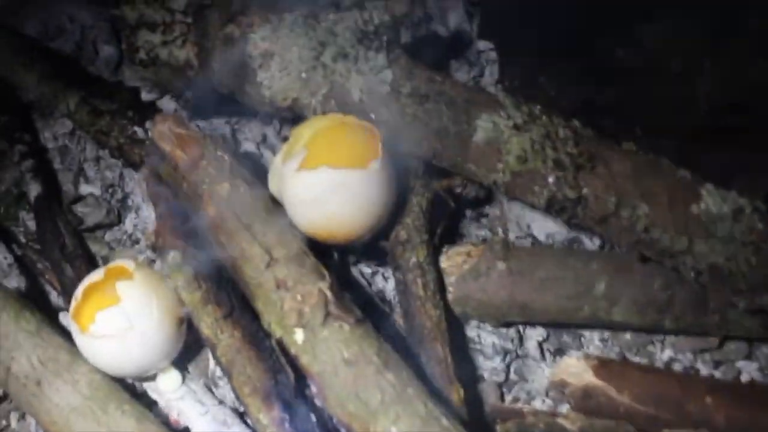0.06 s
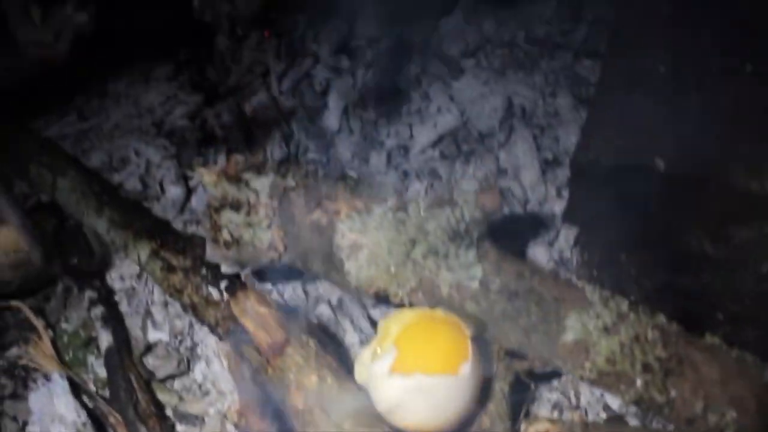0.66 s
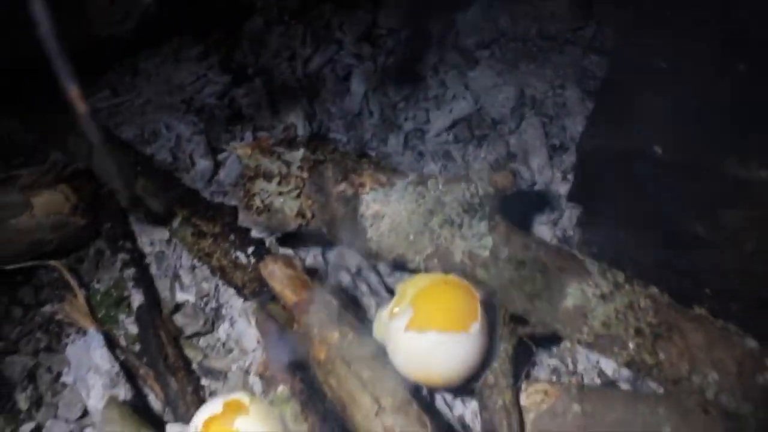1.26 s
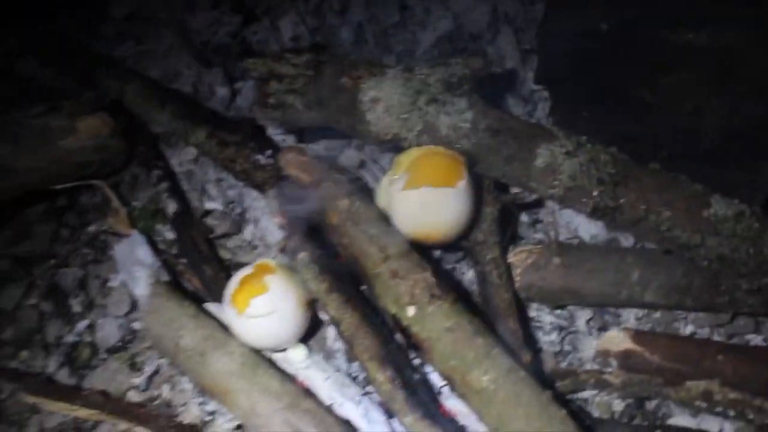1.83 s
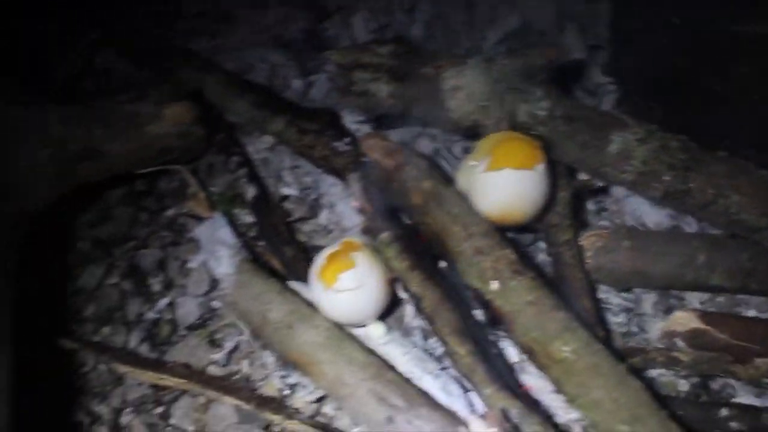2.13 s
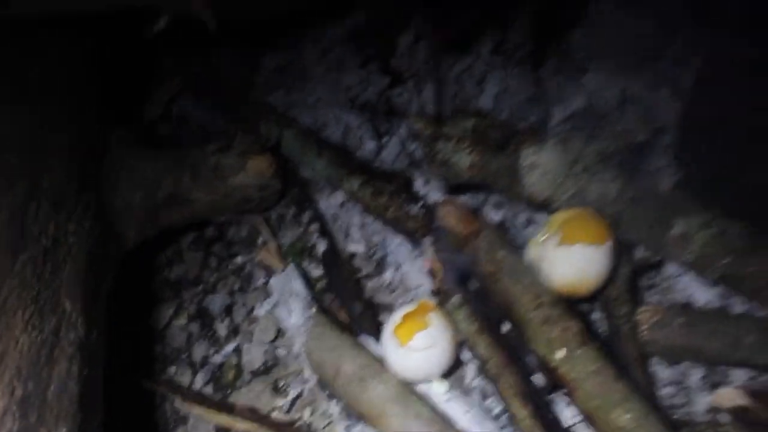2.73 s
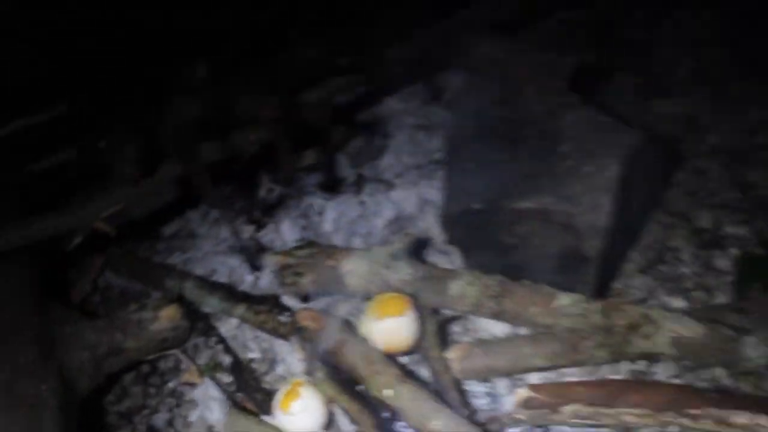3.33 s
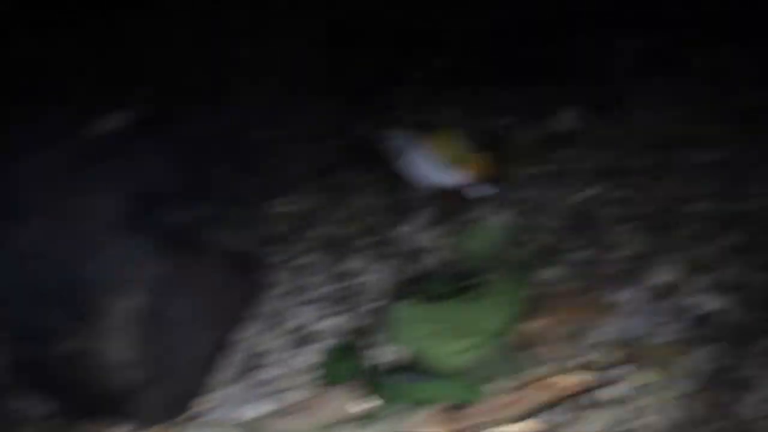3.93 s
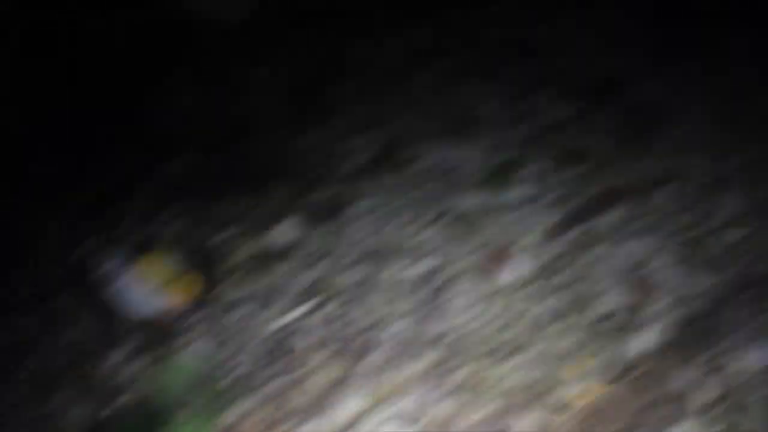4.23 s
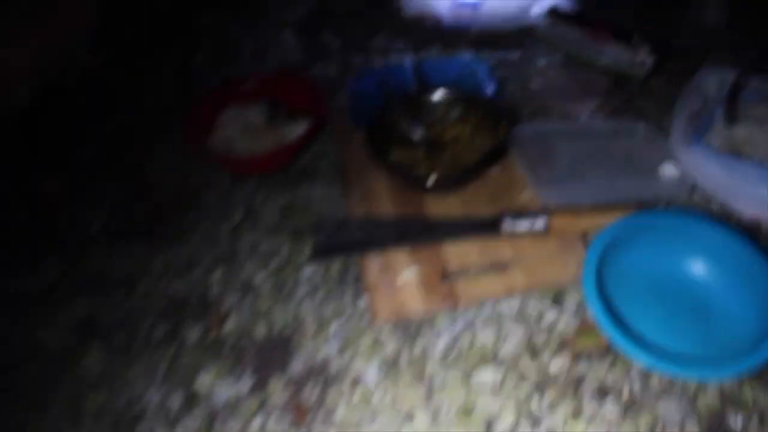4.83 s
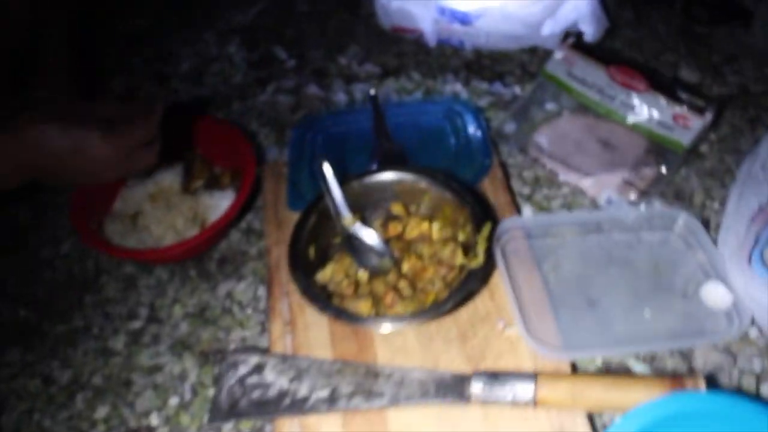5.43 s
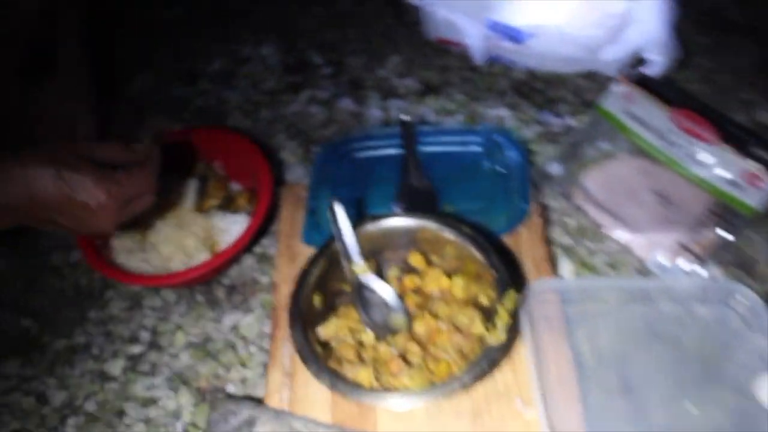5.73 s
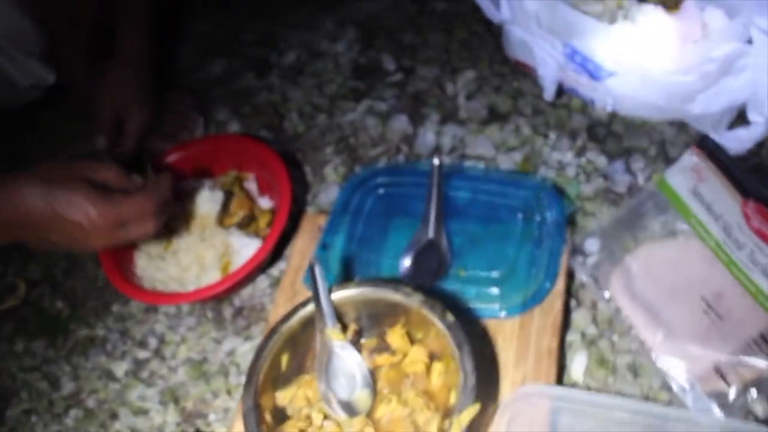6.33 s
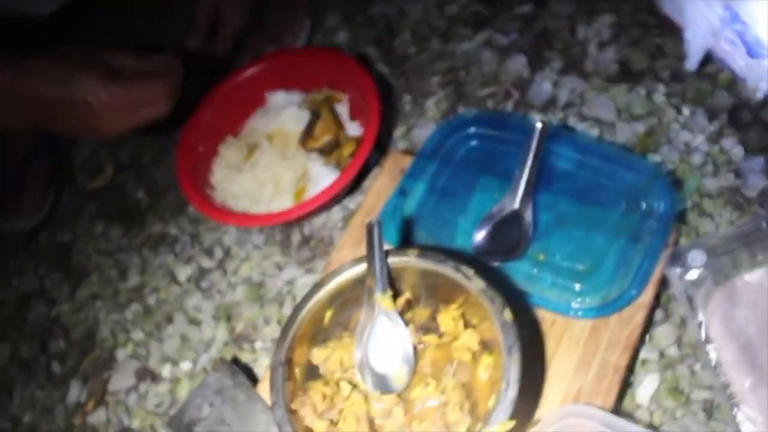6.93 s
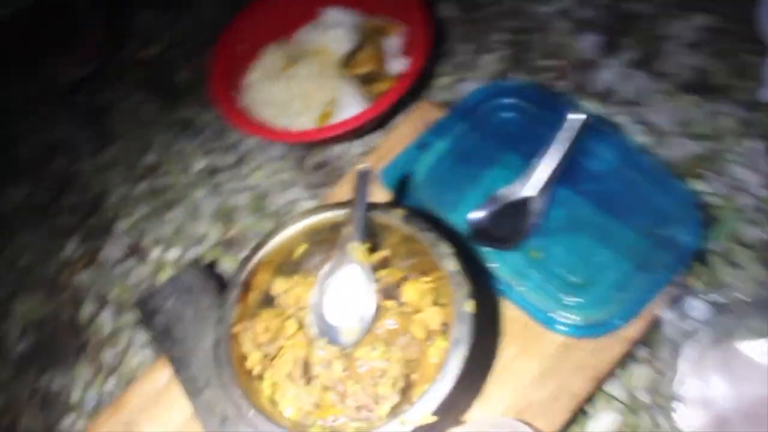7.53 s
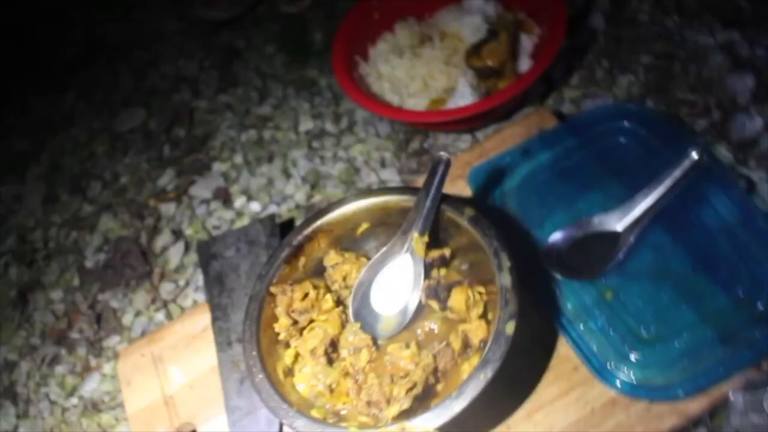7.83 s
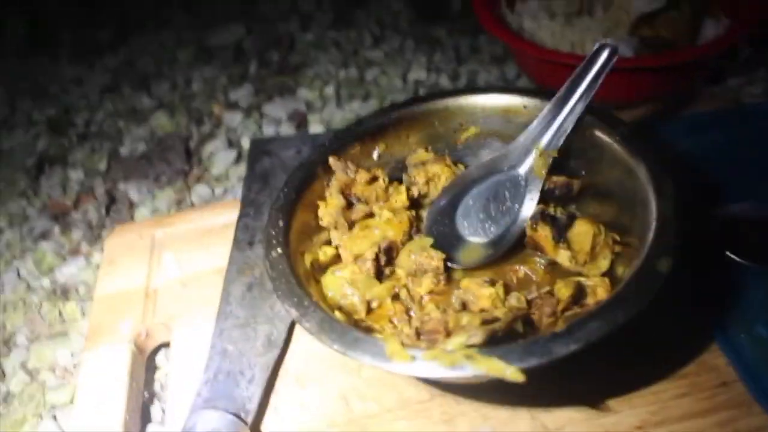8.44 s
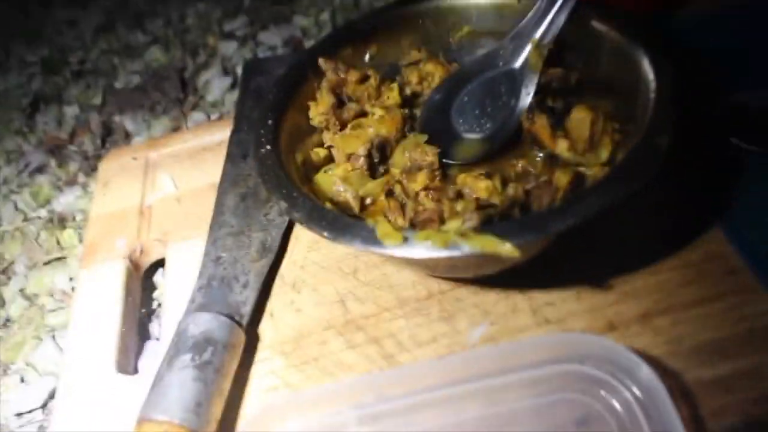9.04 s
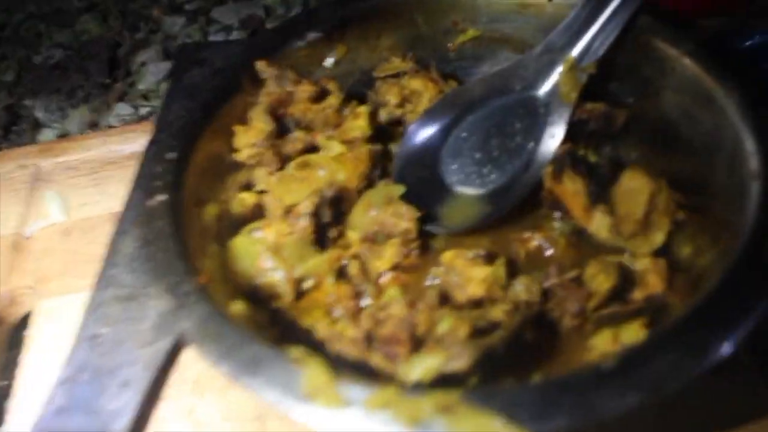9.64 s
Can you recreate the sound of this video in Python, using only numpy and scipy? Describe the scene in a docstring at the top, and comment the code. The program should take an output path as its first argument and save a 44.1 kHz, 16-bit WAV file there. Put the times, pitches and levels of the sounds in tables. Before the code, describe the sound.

Sharp cracks of burning wood, one short and two long owl hoots, and faint crickets and a rasping katydid in a night forest.

```python
"""A wood fire snaps close by in a night forest, and an owl gives one short and two long, low hoots.
Pockets of gas burst the logs; the owl's puffed throat sounds a nearly pure voice that slopes and
trees echo. On the left a katydid rasps five times a second, scraper over file. A cricket trills,
another chirps, and a far insect chorus hums in a soft hiss, with a little microphone rumble
and one faint, hollow tap near the end."""
import sys
import numpy as np
from scipy import signal
from scipy.fft import rfft, irfft, next_fast_len
from scipy.io import wavfile
from scipy.ndimage import uniform_filter1d

SR = 44100
rng = np.random.default_rng(int(sys.argv[2]) if len(sys.argv) > 2 else 0)


def to_wav(sig):
    """Store sig (one row per channel, or 1-D mono) as 16-bit WAV at the path in sys.argv[1].

    Samples outside -1..1 are clipped; the rate is SR.
    """
    pcm = np.clip(np.atleast_2d(sig), -1, 1) * 32767
    pcm = np.round(pcm).astype(np.int16)
    wavfile.write(sys.argv[1], SR, pcm.T)  # frames by channels


N = 426447
TIME = np.arange(N) / SR
# how alike the two channels are for far sound: (frequency [Hz], coherence [0-1])
COHERENCE = [(60, 0.54), (600, 0.7), (1400, 0.43), (3000, 0.13), (4500, 0.41), (7000, 0.09), (15000, 0)]


def gain_of(db):
    """Decibels to a gain."""
    return 10 ** (np.asarray(db) / 20)


def unit_rms(x):
    """Scaled to an rms of one."""
    return x / np.sqrt(np.mean(x ** 2) + 1e-20)


def curve_at(points, hz):
    """A curve's value at hz, on a log-frequency axis."""
    f, value = np.transpose(points)
    return np.interp(np.log(hz + 1), np.log(f + 1), value)


def add(mix, s, sound):
    """Adds a sound into the mix at s seconds."""
    part = mix[..., max(round(s * SR), 0):][..., :sound.shape[-1]]
    part += sound[..., :part.shape[-1]]


def panned(x, balance_db):
    """Two channels, the left louder by balance_db."""
    return x * gain_of(np.array([[balance_db], [-balance_db]]) / 2)


def delayed(x, samples):
    """A delay by a small, fractional number of samples."""
    size = 2 * len(x)
    return irfft(rfft(x, size) * np.exp(-2j * np.pi * np.fft.rfftfreq(size) * samples), size)[:len(x)]


def drift(rate):
    """Smooth random modulation of unit rms, changing about rate times a second."""
    lowpass = np.exp(-(np.fft.rfftfreq(N, 1 / SR) / rate) ** 2)
    return unit_rms(irfft(rfft(rng.standard_normal(N)) * lowpass, N))


def ring(points, size=1024):
    """The causal impulse response of a spectrum: (frequency [Hz], level [dB])."""
    log_gain = np.log(gain_of(curve_at(points, abs(np.fft.fftfreq(size, 1 / SR)))))
    return np.fft.ifft(np.exp(np.conj(signal.hilbert(log_gain)))).real


def far_noise(gain):
    """Noise from all around, coloured by a gain that is a function of frequency."""
    size = next_fast_len(N)
    hz = np.fft.rfftfreq(size, 1 / SR)
    left, other = rfft(rng.standard_normal((2, size)))
    same = curve_at(COHERENCE, hz)
    right = same * left + np.sqrt(1 - same ** 2) * other
    return unit_rms(irfft(np.array([left, right]) * gain(hz), size)[:, :N])


def forest(x, delay=.008):
    """Scattered echoes from trunks and leaves; the treble dies first."""
    # reverb among the trees: (frequency [Hz], time to fall 60 dB [s])
    decay_times = [(300, 0.95), (700, 0.47), (2000, 0.24), (7000, 0.3), (11000, 0.27), (16000, .11)]
    taps = rng.standard_normal((2, SR)) * (rng.random(SR) < 3000 / SR)
    hz, t, bands = signal.stft(taps, SR, nperseg=256)
    same, t60 = curve_at(COHERENCE, hz)[:, None], curve_at(decay_times, hz)[:, None]
    bands[1] = same * bands[0] + np.sqrt(1 - same ** 2) * bands[1]
    decay = gain_of(-60 * t / t60) * np.sqrt(np.log(1e6) / t60)
    tail = signal.istft(bands * decay, SR, nperseg=256)[1] / np.linalg.norm(taps[0])
    out = np.zeros((2, N))
    add(out, delay, signal.fftconvolve(np.atleast_2d(x), tail, axes=1))
    return out


def night_bed(hiss_db=-50.5):
    """A soft hiss and the blurred bands of far insects."""
    # soft night hiss, cut off above about 16 kHz by a low-pass: (frequency [Hz], relative level [dB])
    hiss_colour = [(15, -35), (40, -13.5), (110, -4), (220, -4), (420, 0.5), (800, -1), (1300, -3),
                   (2400, -7), (3200, -10), (6000, -11), (9000, -9), (11000, -16.5), (15600, -19.5),
                   (16400, -34)]
    # far insect choruses: (centre [Hz], width [Hz], level [dB])
    choruses = [(1806, 117, -58.5), (1975, 257, -57.5), (2800, 220, -65.5), (4140, 610, -56),
                (4660, 530, -57.5)]
    bed = gain_of(hiss_db) * far_noise(lambda f: gain_of(curve_at(hiss_colour, f)))
    for hz, width, level_db in choruses:
        flicker = gain_of(level_db + drift(20))
        bed += flicker * far_noise(lambda f: 1 / (1 + 2 * ((f - hz) / width) ** 2) ** 1.45)
    return bed


def handling_rumble():
    """The carried microphone rumbles a little."""
    # the rumble's fader moves: (time [s], level [dB])
    levels = [(2.9, -98), (3.4, -66), (4.1, -68), (4.8, -62), (5.1, -75), (5.5, -77)]
    colour = [(10, -11), (30, -6.5), (110, -7), (250, -21), (800, -75)]  # (frequency [Hz], level [dB])
    rumble = far_noise(lambda f: gain_of(curve_at(colour, f)))
    return rumble * gain_of(np.interp(TIME, *np.transpose(levels)))


def soft_tap(s=8.950, hz=535, level_db=-42, t60=.072, attack_s=.00055):
    """One faint, hollow tap: a damped sine."""
    t = np.arange(4096) / SR
    envelope = gain_of(level_db - 60 * t / t60) * (1 - np.exp(-t / attack_s))
    out = np.zeros(N)
    add(out, s, envelope * np.sin(2 * np.pi * hz * t))
    return out


def chirping_cricket(hz=5510, arch_hz=140, half_width_s=.012, level_db=-68, echo_db=-5):
    """Short, thin chirps about ten times a second, each a little arch in pitch."""
    first_s, period_s = .057, .0977
    from_centre = ((TIME - first_s + period_s / 2) % period_s - period_s / 2) / half_width_s
    pitch = hz - arch_hz * np.minimum((from_centre + .3) ** 2, 4) + 40 * drift(60.2)
    song = np.exp(-from_centre ** 2) * np.sin(2 * np.pi * np.cumsum(pitch) / SR)
    song = gain_of(level_db) * unit_rms(song * gain_of(1.2 * drift(3.4)))
    return panned(song, balance_db=7.3) + gain_of(echo_db) * forest(song)


def trilling_cricket(strokes_per_s=59.5, top_hz=4800, bottom_hz=4050, duty=.68, level_db=-56, echo_db=-4):
    """An endless trill; the pitch falls within every wing stroke."""
    cycles = np.cumsum(strokes_per_s * (1 + .012 * drift(20))) / SR
    stroke = np.minimum(cycles % 1 / duty, 1)
    hz = top_hz + (bottom_hz - top_hz) * stroke ** 1.4 + 60 * drift(150)
    song = np.sin(np.pi * stroke) * np.sin(2 * np.pi * np.cumsum(hz) / SR) * gain_of(2 * drift(40))
    song = gain_of(level_db) * unit_rms(song)
    return song + gain_of(echo_db) * forest(song)


def wing_closures(unsteady_s=.002):
    """The moments at which the katydid's wings shut: nearly even within each run."""
    # runs at a steady tempo: (first closure [s], last closure [s], stroke rate [1/s])
    runs = [(0.104, 1.332, 5.7), (1.548, 5.657, 5.1), (5.844, 7.906, 5.35), (8.306, 9.574, 5.5)]
    even = np.concatenate([np.linspace(first, last, round((last - first) * rate) + 1)
                           for first, last, rate in runs])
    return even + unsteady_s * rng.standard_normal(len(even))


def katydid(stroke_s=.057, level_db=-53, shut_db=-9, echo_db=-7, leaf_db=-6, leaf_decay_s=.023):
    """The scraper runs over the file's teeth ever more slowly, then the wings shut with a falling blip."""
    wing = ring([(8000, -43), (10300, -5), (11400, 8), (12300, 6.5), (13200, 1.5), (14600, 11.5),
                 (15600, 8.5), (16200, -34)])
    t, blip_t = np.arange(round(stroke_s * SR)) / SR, np.arange(110) / SR
    blip = np.hanning(len(blip_t)) * signal.chirp(blip_t, 13800, blip_t[-1], 10600)
    swell = np.interp(t / stroke_s, [0, .2, .6, .85, 1], [.25, .64, .84, 1, .25])
    song = np.zeros(N)
    for s in wing_closures():
        tooth_rate = np.linspace(720, 400, len(t)) * rng.uniform(.76, .96)
        tooth_rate *= 1 + .25 * np.repeat(rng.standard_normal(len(t)), 64)[:len(t)].clip(-3, 3)
        teeth = np.diff(np.floor(np.cumsum(tooth_rate) / SR), prepend=0)
        strikes = teeth * swell * gain_of(2 * rng.standard_normal(len(t)))
        add(song, s - stroke_s, signal.fftconvolve(strikes, wing))
        add(song, s - blip_t[-1] / 2, gain_of(shut_db + 2 * rng.standard_normal()) * blip)
    # leaves right beside the insect smear the tooth strikes
    leaves = rng.standard_normal(len(t)) * np.exp(-t / leaf_decay_s)
    song = unit_rms(song) + gain_of(leaf_db) * unit_rms(signal.fftconvolve(song, leaves)[:N])
    song = gain_of(level_db + .85 * drift(25)) * unit_rms(song)
    direct = np.array([song, delayed(song, samples=6.54)])  # it reaches the left microphone first
    return panned(direct, balance_db=7) + gain_of(echo_db) * forest(song, delay=.002)


def fibre_burst(envelope):
    """Splitting fibres: a short burst of noise with unit energy, spread evenly over the spectrum."""
    spectrum = rfft(rng.standard_normal(len(envelope)) * envelope)
    smooth_power = uniform_filter1d(abs(spectrum) ** 2, size=90)
    return irfft(spectrum / np.sqrt(smooth_power + 1e-12), len(envelope))


def snap(depth, top_db, scatter_db, burst_s=.00038, scatter_s=.0037, thud_s=.0095):
    """A gas pocket bursts the wood; logs scatter the crack and answer with a dull knock."""
    # the dull answer of a log: (frequency [Hz], level [dB])
    log_colour = [(40, -16), (130, -7), (280, 0.5), (550, -1.5), (1000, -8), (2500, -19), (8000, -78)]
    # at the bark (depth 0) a snap is thin and high; deep in the log (depth 1) it is full
    edge_hz, body_db = np.interp(depth, [0, 1], [6120, 6100]), np.interp(depth, [0, 1], [-25, -3.5])
    knock_db = np.interp(depth ** 2.3, [0, 1], [-36.5, 6.5])  # only the deepest move the whole log
    t = np.arange(2048) / SR
    attack, fade = 1 - np.exp(-t / burst_s), np.minimum(2 - 2 * t / t[-1], 1) ** 2
    spike = t / burst_s * np.exp(1 - 2 * t / burst_s)
    scatter = gain_of(scatter_db) * np.exp(-t / scatter_s) * attack
    shared, left, right = fade * np.array([fibre_burst(spike + scatter) for _ in range(3)])
    fracture = (shared + np.array([left, right])) / np.sqrt(2)
    wood = ring([(100, body_db - 16), (600, body_db - 7), (1100, body_db), (2000, body_db),
                 (edge_hz * .53, .65 * body_db - 2), (edge_hz, 0), (8000, -.5),
                 (12000, top_db), (16000, top_db - 10.5)])
    crack = signal.fftconvolve(fracture, wood[None], axes=1)
    push = fade * fibre_burst(attack * np.exp(-t / thud_s))
    return crack + gain_of(knock_db) * signal.fftconvolve(push, ring(log_colour))


def fire(gain_db=32, ticks_per_s=9, tick_db=-51, tick_top_db=-6, echo_db=-12, big_snap_db=-16.5):
    """Loud snaps of burning wood and faint ticks of the embers between them, echoed by the trees."""
    # snaps: (time [s], relative level [dB], depth in the log [0-1], top at 12 kHz [dB], pan left [dB])
    snaps = [(0.3085, -35, .45, 0, -1), (0.4716, -38.5, 0.28, -12, 2), (0.6287, -21, 0.75, -9, 0.5),
             (1.1728, -23.5, 0.2, -6, -3), (1.3479, -31.5, .95, -3.5, 0), (1.4086, -33, 0.37, -13, -6),
             (1.9688, -38.5, 0.5, -5, 0), (2.5857, -39.5, 0.4, -7, 1), (2.6541, -39, 0.1, -9, -2),
             (2.83, -23, 0.1, -.5, 0), (3.016, -41, .35, -14, -3), (4.0879, -20.5, 0.97, -14, 1),
             (4.2791, -26.5, 0.73, -10, -2), (4.516, -16, 0.96, -15.5, -1),
             (5.0753, -11, 0.66, -13.5, -0.5), (5.5326, -25.5, .05, -6, 3.5), (6.033, -29.5, 0.34, -9, -6),
             (6.1205, -40, .35, -11, 2), (6.2886, -22, 0, -5, -7), (6.3607, -30.5, 0.95, -13, -2),
             (6.6865, -37.5, 0.64, -9, 1), (7.2023, -37, 0.1, -13, -4), (7.3045, -35, 0, -20, -2),
             (7.7621, -36, 0.5, -18, 3), (7.9053, -36, 0, -13, 0), (7.9316, -38.5, .6, -4, -4),
             (8.1416, -23, .35, -14, -1.5), (8.3257, -38.5, 0.1, -12, -3)]
    # direction of the fire as the microphones turn: (time [s], lag of the left channel [samples])
    bearing = [(0, -1), (2.8, -4), (4.2, 7), (4.5, 5), (5.5, 4), (8, 3.5)]
    draws = rng.random((200, 4))
    draws[:, 0] *= len(draws) / ticks_per_s
    ticks = [(s, tick_db + 10 * size ** 3, .75 * depth, tick_top_db, 4 * side - 2)
             for s, size, depth, side in draws if s < N / SR]
    near, sends = np.zeros((2, N)), np.zeros((3, N))
    for k, (s, level_db, depth, top_db, side_db) in enumerate(list(snaps) + ticks):
        scatter_db = -9 + .098 * (level_db + 18)  # a big snap splinters on; a small one is a bare tick
        left, right = gain_of(gain_db + level_db) * snap(depth, top_db, scatter_db)
        lag = np.interp(s, *np.transpose(bearing))
        direct = np.array([delayed(left, max(lag, 0)), delayed(right, max(-lag, 0))])
        add(near, s, panned(direct, side_db))
        send_db = echo_db + .64 * max(level_db - big_snap_db, 0)  # the biggest snaps are wetter
        # snaps take turns among three reverbs, so their tails do not ring alike
        add(sends[k % len(sends)], s, gain_of(send_db) * left)
    return near + sum(forest(send) for send in sends)


def quaver(t, sharpness=2.93):
    """How far the pitch sinks, in Hz, as the owl's voice catches in quick, regular dips."""
    # quavering stretches: (start [s], end [s], dip rate [1/s], first depth [Hz], last depth [Hz])
    stretches = [(3.756, 3.976, 17.8, 25.5, 19.7), (4.720, 4.849, 15.6, 5.6, 37.6)]
    sink_hz = 0
    for start, end, rate, first_hz, last_hz in stretches:
        depth_hz = np.interp(t, [start, end], [first_hz, last_hz], left=0, right=0)
        sink_hz += depth_hz * abs(np.sin(np.pi * rate * (t - start))) ** sharpness
    return sink_hz


def hoot(start, end, aim_hz, level_db, rise_s, fall_s):
    """A nearly pure voice that scoops up, sags and drops back; the throat passes mainly two harmonics."""
    # the puffed throat behind a closed beak: (frequency [Hz], level [dB])
    throat = [(70, -5.5), (170, 2), (285, 4), (440, 3.5), (560, -3), (650, -7), (760, -31), (950, -29),
              (1250, -38.5), (1700, -47)]
    # air that hisses past the beak: (frequency [Hz], level [dB])
    beak_leak = [(300, -7), (900, 13.5), (1350, 7), (2000, -15.5), (5000, -45)]
    slack_hz, sag_hz_per_s, fade_s = 164.5, 24.2, .009
    reference_hz, db_per_octave = 301, 25.5  # breath pressure lifts pitch and loudness together
    jitter, shimmer_db, husk_db, leak_db = .0063, 1.36, -35, -15
    t = np.arange(0, end - start, 1 / SR)
    effort = np.tanh(t / rise_s) * (1 - np.exp((t - t[-1]) / fall_s))
    hz = slack_hz + (aim_hz - sag_hz_per_s * t - slack_hz) * effort - quaver(start + t)
    loudness_db = level_db + db_per_octave * np.log2(hz / reference_hz)
    hz *= 1 + jitter * drift(77)[:len(t)]
    phase = 2 * np.pi * np.cumsum(hz) / SR
    fundamental, *overtones = (gain_of(curve_at(throat, k * hz)) * np.sin(k * phase) for k in range(1, 6))
    voice = fundamental + sum(overtones) * gain_of(shimmer_db * drift(50)[:len(t)])
    airway = ring(throat) + gain_of(leak_db) * ring(beak_leak)
    husk = signal.fftconvolve(rng.standard_normal(len(t)), airway)[:len(t)]
    call = unit_rms(voice) + gain_of(husk_db) * unit_rms(husk)
    fade = np.sin(np.pi / 2 * np.minimum(np.minimum(t, t[-1] - t) / fade_s, 1))
    return call * gain_of(loudness_db + .5 * drift(30)[:len(t)]) * fade


def owl(echo_db=-24, slope_cutoff_hz=560):
    """Three hoots straight ahead; the slopes throw them back and the trees blur them."""
    # hoots: (start [s], end [s], aimed pitch [Hz], level at the reference pitch [dB], rise [s], fall [s])
    hoots = [(3.395, 3.483, 351.3, -19, .035, 0.03), (3.651, 4.057, 317.4, -19.5, .029, .026),
             (4.556, 4.989, 329.9, -19, .035, 0.0308)]
    # echoes from the slopes around: (delay [s], level [dB])
    slope_echoes = [(.052, -20), (.14, -21), (.2, -23.5), (.275, -31.5)]
    calls, slopes = np.zeros((2, N))
    for start, *shape in hoots:
        add(calls, start, hoot(start, *shape))
    dull = signal.lfilter(*signal.butter(2, slope_cutoff_hz, fs=SR), calls)
    for delay, level_db in slope_echoes:
        add(slopes, delay, gain_of(level_db) * dull)
    trees = forest(calls, delay=.027).mean(axis=0)
    return calls + slopes + gain_of(echo_db) * trees


def scene():
    """The owl, the camp and the insects over the night hiss, in stereo."""
    foreground = owl() + fire() + soft_tap()
    insects = katydid() + trilling_cricket() + chirping_cricket()
    return foreground + insects + night_bed() + handling_rumble()


def record(dry, ceiling=.78, cutoff_hz=16700):
    """The loudest peaks are held under a ceiling; a steep low-pass then trims the top."""
    clipped = np.clip(dry, -ceiling, ceiling)
    lowpass = signal.firwin(255, cutoff_hz, window=("kaiser", 9), fs=SR)
    return signal.oaconvolve(clipped, lowpass[None], "same")


dry = scene()
out = record(dry)
to_wav(out)
```